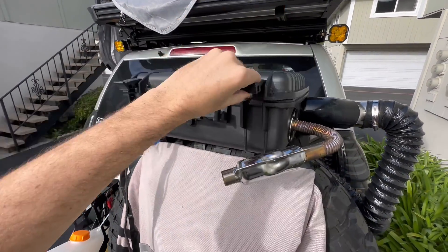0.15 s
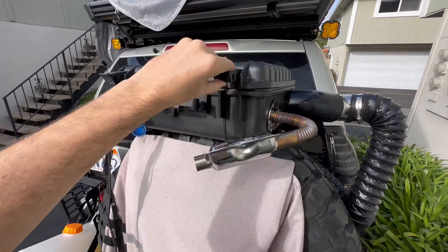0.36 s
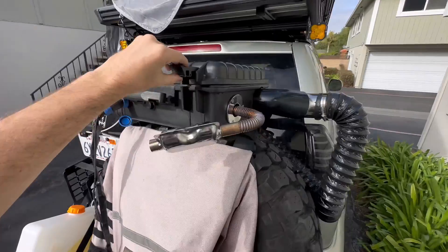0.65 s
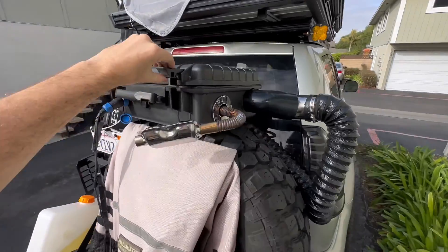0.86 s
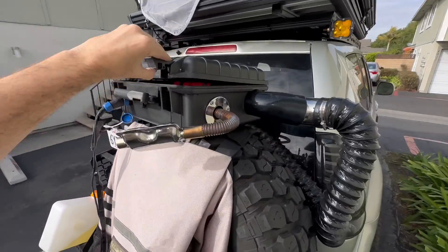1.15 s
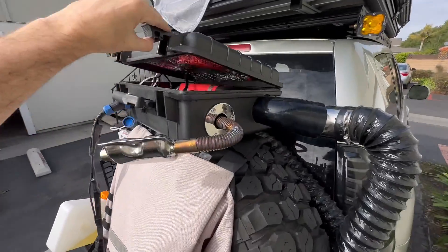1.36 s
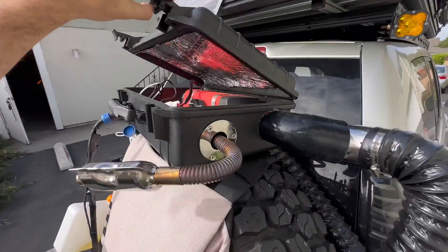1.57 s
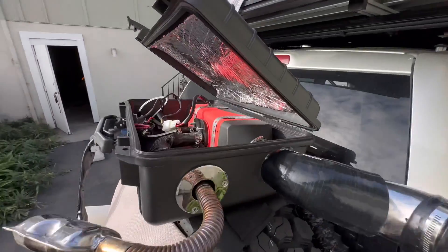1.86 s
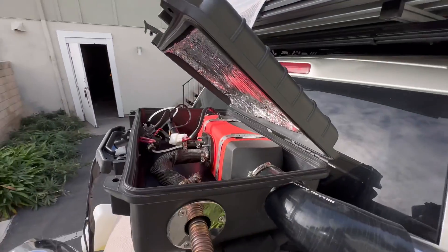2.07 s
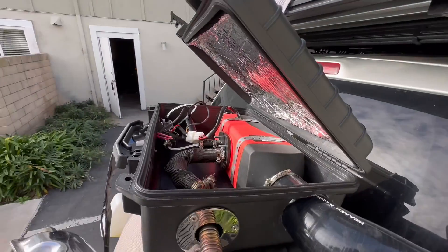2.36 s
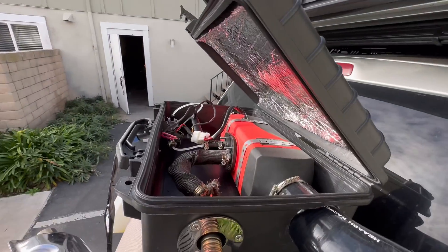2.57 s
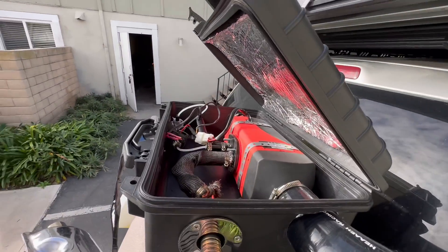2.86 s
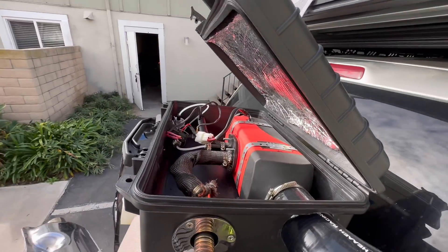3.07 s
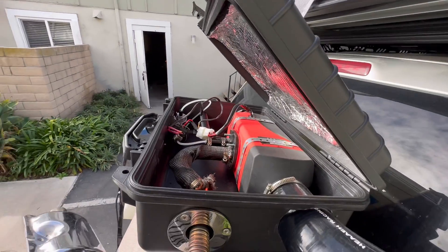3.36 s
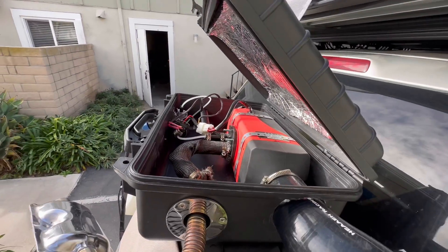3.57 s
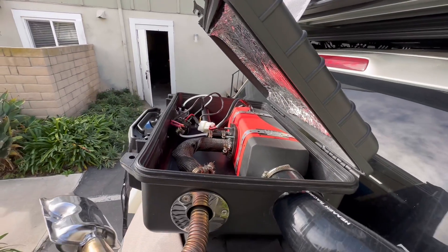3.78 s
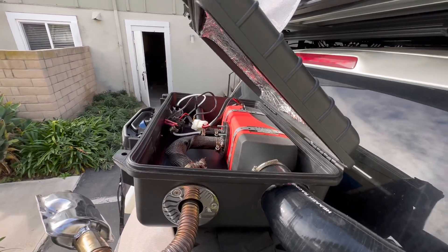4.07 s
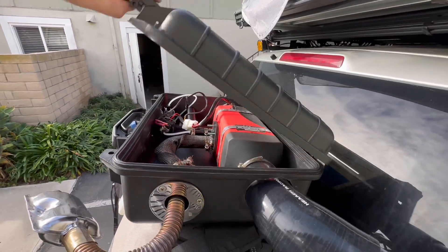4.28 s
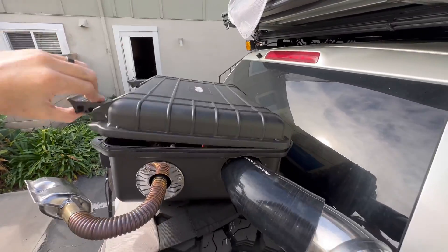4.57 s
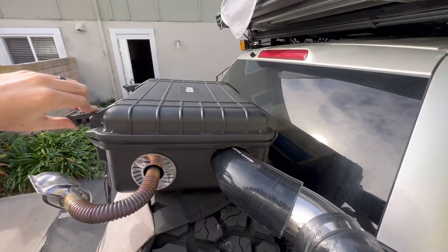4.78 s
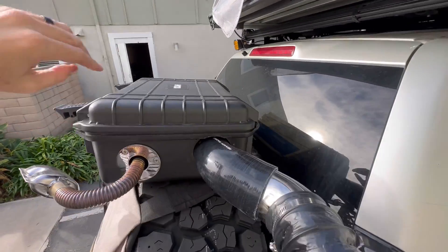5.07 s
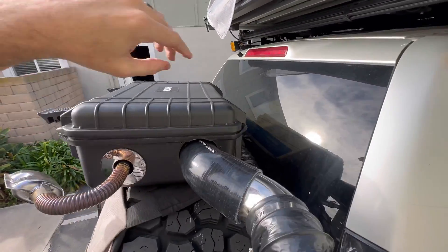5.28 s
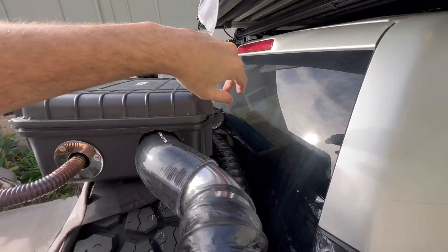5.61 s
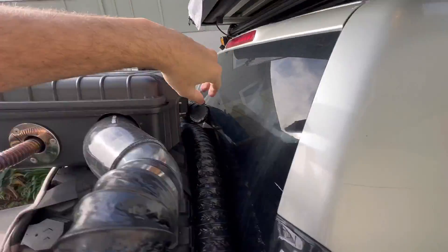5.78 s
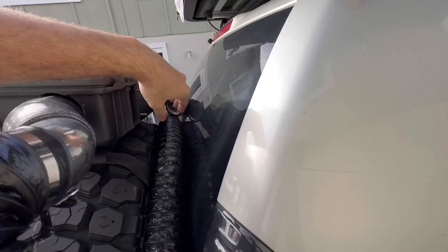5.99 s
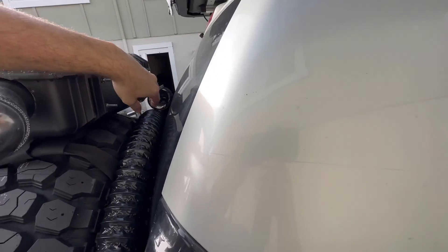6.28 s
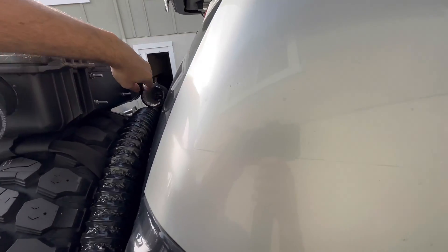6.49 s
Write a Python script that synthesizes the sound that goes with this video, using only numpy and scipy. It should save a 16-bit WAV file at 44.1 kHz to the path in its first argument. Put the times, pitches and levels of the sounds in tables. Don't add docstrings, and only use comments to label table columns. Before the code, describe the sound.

Close outdoor sound of a small diesel air heater running without pause: low burner roar, slow-throbbing motor hum and a hollow, windy tone from the exhaust pipe. The lid lifts after about a second, letting out brighter blower hiss and thin high whine. It closes again, leaving a duller, boxy drone, then a hand knocks and brushes the plastic. A moving handheld stereo microphone shifts the tone and balance.

```python
import sys
import numpy as np
from scipy import signal
from scipy.fft import rfft, irfft
from scipy.io import wavfile
from scipy.ndimage import uniform_filter1d

SR = 44100
rng = np.random.default_rng(int(sys.argv[2]) if len(sys.argv) > 2 else 0)


def put_to_file(sound):
    columns = np.atleast_2d(sound).T
    safe = np.clip(columns, -1, 1)
    whole_steps = np.round(safe * 32767)
    wavfile.write(sys.argv[1], SR, whole_steps.astype(np.int16))


def gain_from_decibels(decibels):
    exponent = np.asarray(decibels, float) / 20
    return 10 ** exponent


N = 293265
SIZE, HOP = 2048, 512
HZ = np.fft.rfftfreq(SIZE, 1 / SR)[:, None]
S = (np.arange(N // HOP + 6) * HOP / SR)[None]

# (time [s], peak level [dB], colour [Hz], t60 [s], left-right [dB])
TAPS = [(.629, -45, 7500, .008, 2), (1.13, -62, 5000, .05, 3), (1.7435, -40, 2000, .025, 3),
        (1.751, -45, 1900, .08, 3), (4.585, -62, 9000, .02, 3), (5.6201, -46, 7500, .008, 1),
        (5.6203, -34.5, 4800, .011, 1), (5.63, -68, 15000, .22, 1), (5.62, -34.5, 2000, .03, 3),
        (5.6265, -35.5, 2300, .016, 4), (5.633, -43, 2000, .03, 4), (5.624, -51, 4200, .085, 3),
        (5.641, -48, 2600, .06, 4), (5.652, -51, 3000, .06, 4), (5.658, -55, 4500, .02, 4),
        (5.727, -57, 3600, .02, 5), (5.83, -56, 2000, .12, 4), (5.667, -54, 2500, .08, 4),
        (5.7264, -46, 2000, .04, 5), (5.736, -52, 2100, .08, 5)]
# (time [s], level [dB])
SLEEVE = [(5.78, -80), (5.82, -65), (5.86, -63), (5.885, -58.5), (5.935, -57), (5.96, -63), (6.02, -68),
          (6.06, -80)]

# (frequency [Hz], likeness [0-1])
PORT_LIKENESS = [(30, .05), (50, .25), (80, .92), (150, .97), (300, .92), (600, .88), (1000, .55),
                 (1300, .96), (1650, .88), (1950, .4), (2550, .75), (4000, .45), (9000, .3)]
# (frequency [Hz], left-right [dB])
BODY_SHADOW = [(3000, 0), (5500, 4), (7500, 1.5), (9200, -9.5), (10500, 1.5)]
# (time [s], nearness [dB], turn [0 facing it, 1 leaving it on the left])
CAMERA = [(0, -2, 0.075), (.25, -0.4, 0.08), (.6, -1, 0.39), (.85, -2.5, 0.52), (1.2, -1, 0.57),
          (1.6, 0, 0.82), (1.8, 1.5, 0.82), (2.1, -0.2, 1.12), (2.4, 1.6, 0.96), (3, 1.5, 1.04),
          (3.5, 1.1, 1.13), (4.2, 2.1, 1.13), (4.8, -2, 1.04), (5.2, -1, 1.18), (5.45, -3.5, 1.08),
          (5.8, -4.5, 1.08), (6.05, -6, 1.07), (6.65, -8, 1.08)]
# (time [s], nearness [dB], left-right [dB], right lag [ms])
MOUTH = [(0, -0.5, 1.5, 0.31), (.4, 1.5, 0, 0.26), (.75, 1.5, -1.5, 0.39), (1.05, -2, -0.5, 0.22),
         (1.4, 0, 2.5, 0.14), (1.75, 3.5, 16.5, 0.43), (2, 3, 10, 0.48), (2.2, -1, 6.5, 0.4),
         (2.6, -1.5, 5, 0.45), (3.1, -1, 4.5, 0.55), (3.8, -1.5, 4.5, 0.36), (4.3, -1, 2, 0.35),
         (4.65, -2, 1, 0.32), (5.1, -10, 2, 0.23), (5.45, -7, 5.5, 0.21), (5.8, -6.5, 4.3, 0.62),
         (6.05, -1, 4, 0.42), (6.65, -7, 2.5, 0.51)]
# (time [s], swing [dB], left-right [dB])
DOOR_ECHO = [(0, 2, -6), (.35, -1.5, -2), (.7, -3.5, 1), (1, 0, 1), (1.35, 1, -6), (1.8, -2.5, -1),
             (2.1, -4.5, 1.5), (2.7, 4, 5.5), (3.2, -2.5, 0.5), (3.6, -0.5, -4), (3.9, -1, 6.5),
             (4.4, -4.5, 4.5), (4.7, -7, -0.5), (5, 3.5, 3.5), (5.45, -2, -0.5), (5.8, 1.5, 2.5),
             (6, -5.5, 8.5), (6.65, -4.5, 1)]
# (time [s], upper half level [dB])
ROAR_TILT = [(0, 0), (.45, -3), (.9, -0.5), (1.3, -4), (1.65, -2), (2, -4), (2.3, -0.5), (2.55, -3.5),
             (2.9, -5), (3.2, 1.5), (3.5, -0.5), (3.8, -3), (4.2, -4), (4.65, -0.5), (5, 2), (5.4, 3),
             (6, 1), (6.65, 3.5)]
# (time [s], opening [0-1])
LID = [
    (.9, 0.24),
    (1.15, 0.68),
    (1.3, 0.73),
    (1.9, 0.86),
    (2.5, 0.94),
    (3.4, 0.98),
    (4.2, 0.9),
    (4.45, 0.85),
    (4.68, 0),
]

# (order, shut level [dB], gain when open [dB], share of echo swing,
# share of mouth lean, throb [dB])
SHAFT_ORDERS = [(3, -45, 0, 0, 0, 3.5), (22, -68, 7, 0, 0, 0), (28, -68, 16, 0, -.7, 0),
                (30, -70, 7.5, -.4, .7, 0), (416.2, -116, 26, 0, 0, 0), (426.15, -104, 27, 0, 0, 0)]
# (order, level [dB])
FAINT_ORDERS = [(84, -76), (86, -75), (90, -79), (120, -83)]

# (frequency [Hz], band number)
HISS_REGION = [(3000, -.2), (4300, .1), (5300, .9), (6400, 1.1), (7100, 1.8), (10300, 2.3), (11800, 3)]
HISS_WIDTHS = [1900, 2200, 3300, 4900]
# (frequency [Hz], level [dB])
HISS_COLOUR = [(1500, -42), (2300, -11.5), (2800, -7.5), (3600, -4), (4200, -4.5), (6300, 6), (6900, 1.5),
               (8600, 3.5), (10700, -3), (12000, -9), (15500, -11.5)]
# (shut level [dB], gain when open [dB], bend of the opening law, share of case nearness)
HISS_MIX = [
    (-57.5, 6.5, 2.1, 0.2),
    (-70.5, 10.5, 2.3, 0.15),
    (-73, 9.5, 1.46, 0.71),
    (-75.5, 21.5, 1.9, 0.74),
]

# (frequency [Hz], width [Hz], level [dB], right lag [ms])
OPEN_RING = [(1340, 180, -38.5, .385), (2160, 110, -55.5, 0.24)]
# (frequency [Hz], width [Hz], level [dB])
SHUT_RING = [(414, 84, -43.5), (504, 19, -43)]
# (frequency [Hz], width [Hz], level [dB])
FRONT_RING = [(690, 110, -42.5), (4110, 230, -66.5), (4780, 200, -78)]

# (frequency [Hz], width [Hz], level [dB])
PIPE_MODES = [
    [(1298, 240, 0)],
    [(1564, 120, 2), (1673, 103, 0.5)],
    [(2200, 230, 0)],
    [(2536, 228, 13), (2570, 25, 2)],
]
# (level [dB], share of mouth nearness, gain with lid open [dB], share of echo swing,
# share of mouth lean)
PIPE_MIX = [
    (-43, 0.63, -2.5, 0.091, 0.26),
    (-37.5, 0.55, 2.5, 0.041, .01),
    (-56.5, 0.88, -5, -0.025, 0.076),
    (-49, 1.04, 0.5, 1.4, .01),
]
# (time [s], pitch factor, right lag [ms])
SECOND_SLIDE = [(0, 1.045, 0.25), (.5, 1.013, 0.26), (1, 0.989, 0.12), (1.4, 1.013, 0.24),
                (1.75, 1.015, 0.15), (2.2, 1.016, 0.44), (2.7, 0.98, 0.29), (3.3, 1, 0.37),
                (3.8, 1.022, 0.34), (4.3, 1.007, 0.48), (4.8, 1.012, 0.38), (5.3, 0.99, 0.37),
                (6, 0.99, 0.43), (6.65, 0.97, 0.31)]
# (time [s], pitch factor, swell of the third resonance [dB])
TOP_SLIDE = [(0, 1, 3.5), (.5, 1.03, 2), (1, 0.996, 2), (1.7, 1, -5), (2.2, 1.01, 3), (2.7, 0.992, 5.5),
             (3.4, 1.05, 2), (4, 1.015, -3), (4.45, 1.02, 5.5), (4.75, 0.99, -12), (5.1, 0.98, 3),
             (5.5, 1.02, 9), (5.85, 1.02, 5), (6.2, 0.98, -10), (6.65, 1.04, 8)]
# (time [s], first level [dB], second level [dB])
PAST_CASE = [(0, 2, -3), (.35, 1.5, -2.5), (.75, 0, -2), (1.05, 0, -2), (1.35, -1, -2), (1.65, 0.5, 0.5),
             (1.95, 1.5, -3), (2.25, -1, -3.5), (2.6, 4, 0.5), (3.1, -2, 0), (3.5, -3, -0.5),
             (3.9, -7, -1.5), (4.35, 0.5, -3), (4.65, 3, -1), (4.9, 2.5, .5), (5.5, -0.5, 0),
             (5.9, -0.5, -5), (6.65, -1, -1)]

# (frequency [Hz], level [dB])
RUMBLE = [(25, -36), (43, -35), (62, -13.5), (80, -5), (110, -0.5), (150, -8), (190, -6), (240, -16.5),
          (300, -32.5), (500, -90)]
# (frequency [Hz], level [dB])
ROAR = [(120, -85), (200, -39.5), (245, -11), (300, -4), (340, -5.5), (375, -3), (425, 0), (475, -1.5),
        (515, -0.5), (560, -5.5), (600, -8), (670, -21.5), (780, -35), (1100, -88.5)]
# (frequency [Hz], level [dB])
KNEE = [(400, -84), (600, 1), (700, -6.5), (770, -1.5), (870, -6), (950, -25.5), (1300, -93)]
# (frequency [Hz], level [dB])
UPPER_ROAR = [(600, -93), (820, -19), (900, 7.5), (1050, 4), (1180, -6.5), (1450, -2), (1950, -8.5),
              (2400, -25), (3000, -31), (5000, -87.5)]
# (frequency [Hz], factor)
ROAR_LEAN = [(200, .1), (300, 1), (700, .9), (1100, .5), (2000, .4)]
# (level [dB], share of case nearness, share of mouth nearness, gain for a full turn [dB],
# gain with lid open [dB])
BURNER_MIX = [
    (-34, 0.26, 0.038, 0, -0.16),
    (-29, 1.22, 0.012, -0.02, -0.62),
    (-40, 0.31, 0.15, -2, 0.6),
    (-46, .05, 0.14, -1, 2.5),
]


def read(points, hz=HZ):
    f, value = np.transpose(points)
    return np.interp(np.log(hz + 1), np.log(f + 1), value)


def curves(rows, s=S):
    at, *columns = np.transpose(rows)
    return [np.interp(s, at, c) for c in columns]


def unit(power):
    return power / power.sum()


def peak(hz, width):
    return unit(1 / (1 + (2 * (HZ - hz) / width) ** 2) ** 2)


def drift(rate_hz, s):
    f = np.geomspace(rate_hz / 20, rate_hz, 20)
    turns = rng.random(20)
    wave = sum(np.sin(2 * np.pi * (a * s + b)) / np.sqrt(a) for a, b in zip(f, turns))
    return wave / wave.std()


def air(power, pan_db, lag_ms, patchy_db, comb_db):
    a, b, c, d, patches, comb = rng.standard_normal((S.size, HZ.size, 6)).T
    patches = uniform_filter1d(uniform_filter1d(patches, size=14, axis=0), size=9, axis=1)
    comb = uniform_filter1d(comb, size=7, axis=0)
    comb = uniform_filter1d(uniform_filter1d(comb, size=40, axis=1), size=40, axis=1)
    comb = comb / comb.std() * np.clip(HZ / 600, 0, 1)
    same = np.clip(read(PORT_LIKENESS), 0, 1)
    left, other = a + 1j * b, c + 1j * d
    delay = np.exp(-2j * np.pi * HZ * lag_ms / 1000)
    right = same * left * delay + np.sqrt(1 - same ** 2) * other
    left_share = 1 / (1 + gain_from_decibels(-2 * pan_db))
    z = np.array([left * np.sqrt(left_share), right * np.sqrt(1 - left_share)])
    z *= np.sqrt(power) * gain_from_decibels(patchy_db * patches / patches.std() + comb_db * comb)
    return np.sqrt(3) * signal.istft(z, nperseg=SIZE, noverlap=SIZE - HOP)[1][:, :N]


def hand():
    out, t = np.zeros((2, N)), np.arange(6000) / SR
    for s, db, hz, t60, pan_db in TAPS:
        band = signal.butter(3, [hz / 2.5, min(hz * 2.2, 19000)], "band", fs=SR, output="sos")
        noise = rng.standard_normal((3, len(t)))
        burst = signal.sosfilt(band, noise[:2] * .6 + noise[2])
        burst = burst / burst.std() * np.minimum(t / .0008, 1)
        pan = np.array([[pan_db / 2], [-pan_db / 2]])
        at = round(s * SR)
        out[:, at:at + len(t)] += burst * gain_from_decibels(db - 60 * t / t60 + pan)
    band = signal.butter(2, [4500, 9000], "band", fs=SR, output="sos")
    rub = signal.sosfilt(band, rng.standard_normal((2, N)))
    grain_db = 3 * np.repeat(rng.standard_normal(N // 150 + 1), 150)[:N]
    rub_db = np.interp(np.arange(N) / SR, *np.transpose(SLEEVE), left=-120, right=-120)
    return out + rub * gain_from_decibels(grain_db) * gain_from_decibels(rub_db)


def motor():
    shaft_hz, throb_s, throb_top_s = 36.78, 0.885, 1.465
    t = np.arange(N) / SR
    slow = t[::HOP]
    speed = 1 + np.interp(t, slow, drift(2, slow)) * .0009
    turns = np.cumsum(shaft_hz * speed) / SR
    lid, echo_db, lean_db = curves(LID, t)[0], curves(DOOR_ECHO, t)[0], curves(MOUTH, t)[1]
    throb = np.cos(2 * np.pi * (t - throb_top_s) / throb_s)
    levels_db = {}
    for order, db, open_db, a, b, throb_db in SHAFT_ORDERS:
        levels_db[order] = db + open_db * lid ** 2 + a * echo_db + b * lean_db + throb_db * throb
    for order, db in FAINT_ORDERS:
        levels_db[order] = db + 0 * t
    out = np.zeros((2, N))
    lean = gain_from_decibels(np.array([[.6], [-.6]]))
    for order, db in levels_db.items():
        waver_db = 2.4 * np.interp(t, slow, drift(12, slow))
        lag = order * shaft_hz * 0.000194 * np.array([[0], [1]])
        tone = np.sin(2 * np.pi * (order * turns - lag + rng.random()))
        out += gain_from_decibels(db + 5.0 + waver_db) * lean * tone
    return out


def blower():
    near_db, lid = curves(CAMERA)[0], np.clip(curves(LID)[0], 0, 2)
    levels_db = [db + open_db * lid ** bend + share * near_db for db, open_db, bend, share in HISS_MIX]
    per_bin_db = [db - 10 * np.log10(width / HZ[1]) for db, width in zip(levels_db, HISS_WIDTHS)]
    pan_db = 2.5 - 2 * lid - 0.81 * near_db
    region = read(HISS_REGION)
    step = np.clip(region.astype(int), 0, 2)
    below, above = np.choose(step, per_bin_db), np.choose(step + 1, per_bin_db)
    power = gain_from_decibels(2 * (below + (above - below) * (region - step) + read(HISS_COLOUR)))
    pan_db = .8 * pan_db * (HZ < 8000) + read(BODY_SHADOW)
    return air(power, pan_db, lag_ms=0.397, patchy_db=1.5, comb_db=1.5)


def case():
    (near_db, turn), lid = curves(CAMERA), np.clip(curves(LID)[0], 0, 1)
    hum_near_db = 2.95 * near_db
    hum = peak(787.6, 13) * gain_from_decibels(2 * (-48.5 + hum_near_db)) * ((1 - lid) * turn) ** 4
    standing = sum(peak(f, w) * gain_from_decibels(2 * (db + hum_near_db)) for f, w, db in SHUT_RING)
    standing = standing * (1 - 0.73 * lid) * turn ** 4
    mouth = sum(peak(f, w) * gain_from_decibels(2 * db) for f, w, db, _ in OPEN_RING) * lid ** 3
    front = sum(peak(f, w) * gain_from_decibels(2 * db) for f, w, db in FRONT_RING) * np.clip(1 - 2 * turn, 0, 1)
    ring_ms, upper_ring_ms = [row[3] for row in OPEN_RING]
    lag_ms = np.select([HZ < 650, HZ < 1000, HZ < 1800], [.55, .1, ring_ms], upper_ring_ms)
    return air(hum + standing + mouth + front, 0.67, lag_ms, patchy_db=-0.1, comb_db=0.5)


def pipe():
    (near_db, low_pan_db, first_ms), (echo_db, high_pan_db) = curves(MOUTH), curves(DOOR_ECHO)
    turn, lid = curves(CAMERA)[1], curves(LID)[0]
    (second, second_ms), (top, swell_db) = curves(SECOND_SLIDE), curves(TOP_SLIDE)
    swells_db = (*curves(PAST_CASE), swell_db, 0)
    slides = (1, second, 1, top)
    power = 0
    for mix, group, slide, group_swell_db in zip(PIPE_MIX, PIPE_MODES, slides, swells_db):
        db, near, lid_db, echo, lean = mix
        level_db = db + near * near_db + lid_db * lid + echo * echo_db + lean * low_pan_db + group_swell_db
        peaks = sum(gain_from_decibels(2 * d) / (1 + (2 * (HZ - hz * slide) / width) ** 2) ** 2 for hz, width, d in group)
        power = power + gain_from_decibels(2 * level_db) * peaks / peaks.sum(0)
    facing = np.clip(1 - 2 * turn, 0, 1)
    high_ms = .45 - .11 * lid ** 2 - .018 * high_pan_db + .13 * (.5 - facing)
    high = HZ > 1950
    lag_ms = np.where(high, high_ms, np.where(HZ > 1450, second_ms, first_ms))
    pan_db = np.where(high, high_pan_db, low_pan_db)
    return gain_from_decibels(-1.02) * air(power, pan_db, lag_ms, patchy_db=1.17, comb_db=1.1)


def burner():
    (near_db, turn), mouth_db, lid = curves(CAMERA), curves(MOUTH)[0], curves(LID)[0]
    power = 0
    for mix, shape in zip(BURNER_MIX, (RUMBLE, ROAR, KNEE, UPPER_ROAR)):
        db, near, mouth, turn_db, lid_db = mix
        level_db = db + near * near_db + mouth * mouth_db + turn_db * turn + lid_db * lid
        power = power + gain_from_decibels(2 * level_db) * unit(gain_from_decibels(2 * read(shape)))
    notch_db = -4.5 * np.exp(-((HZ - 256) / 54.4) ** 2) * np.clip(1 - lid, 0, 1) * turn
    tilt_db = curves(ROAR_TILT)[0] * np.exp(-((HZ - 550) / 70) ** 2)
    power = power * gain_from_decibels(2 * (notch_db + tilt_db))
    pan_db = read(ROAR_LEAN) * (-1 + 7.5 * turn + 0.14 * near_db) + .7
    lag_ms = -0.1 + 0.64 * turn
    low_ms = lag_ms * np.clip(250 / (HZ + 1), 1, 1.4)
    mouth_ms = np.clip(lag_ms + .25 * (S > .3), 0, .5)
    lag_ms = np.where(HZ > 680, mouth_ms, low_ms)
    return gain_from_decibels(-.4) * air(power, pan_db, lag_ms, patchy_db=.6, comb_db=1.1)


def scene():
    return hand() + motor() + blower() + case() + pipe() + burner()


def roll_off(x):
    return signal.sosfilt(signal.butter(12, 16300, fs=SR, output="sos"), x)


def record(dry):
    no_mid_hz, no_side_hz, top_hz = (10350, 12350), (13500, 15300), 15780
    pad = 2048
    dry = np.pad(dry, ((0, 0), (pad, pad)), "reflect")
    size = dry.shape[1]
    hz, t = np.fft.rfftfreq(size, 1 / SR), (np.arange(size) - pad) / SR
    left, right = rfft(dry) * (hz < top_hz)
    edges = [hz < no_mid_hz[0], hz < no_mid_hz[1], hz < no_side_hz[0], hz < no_side_hz[1]]
    mid_db = np.select(edges[:3], [0, -32, 1], 3)
    side_db = np.select(edges, [0, 3, -1, -40], 2)
    gap = mid_db < 0
    mono = dry.mean(0)
    snaps = sum(np.exp(-((t - s) / .003) ** 2) for s in (.63, 5.621))
    kept = .6 * rfft(mono * snaps) * gap
    shut = np.clip(1 - 1.6 * curves(LID, t)[0], 0, 1)
    flicker = shut * np.clip(2 * drift(25, t) + .5, 0, 1)
    kept = kept + .8 * rfft(mono * flicker) * gap * (hz < no_mid_hz[0] + 600)
    mid = (left + right) / 2 * gain_from_decibels(mid_db) + kept
    side = (left - right) / 2 * gain_from_decibels(side_db)
    mix = irfft(np.array([mid + side, mid - side]), size)[:, pad:-pad]
    return roll_off(mix)


dry = scene()
out = record(dry)
put_to_file(out)
```